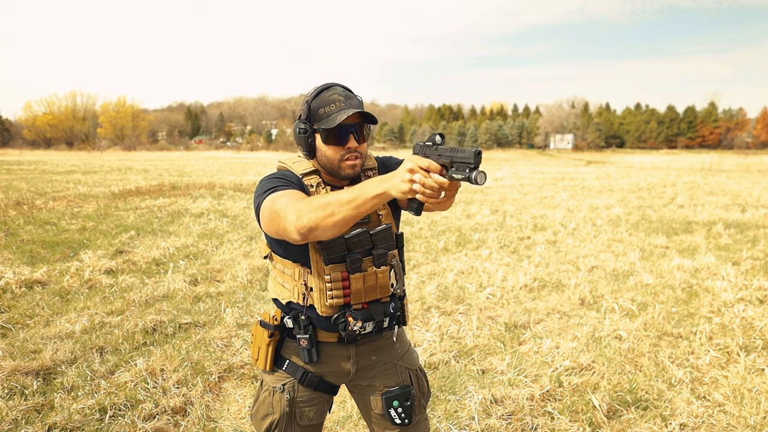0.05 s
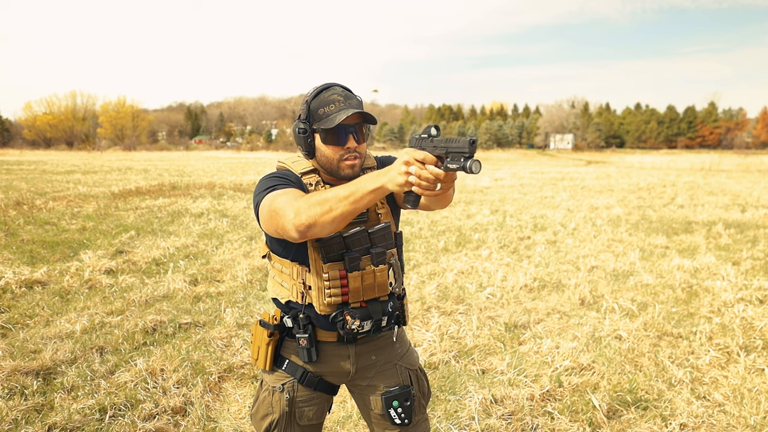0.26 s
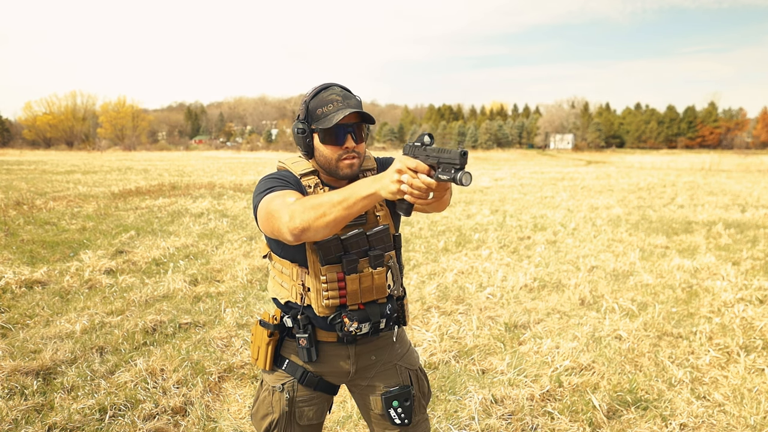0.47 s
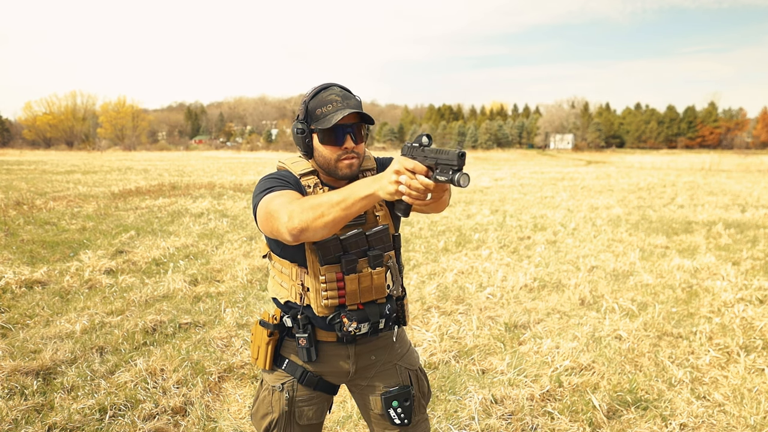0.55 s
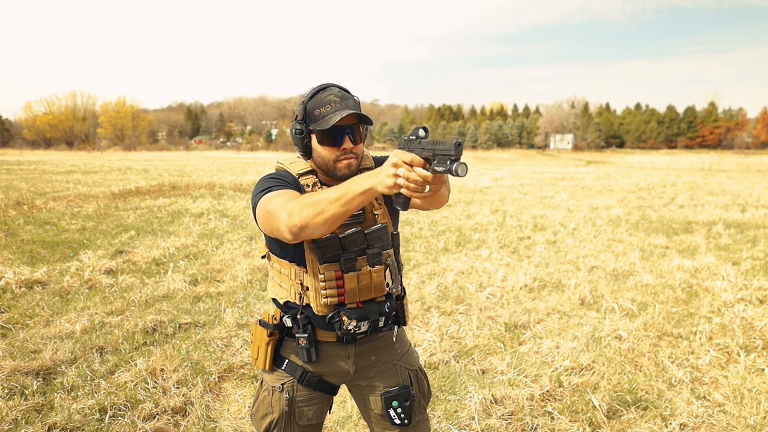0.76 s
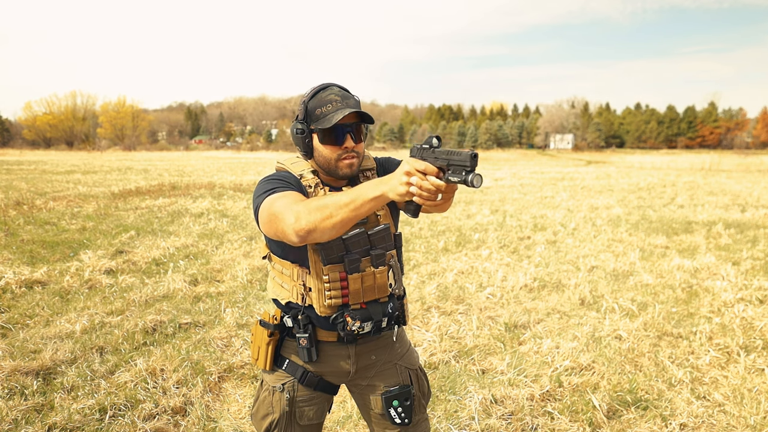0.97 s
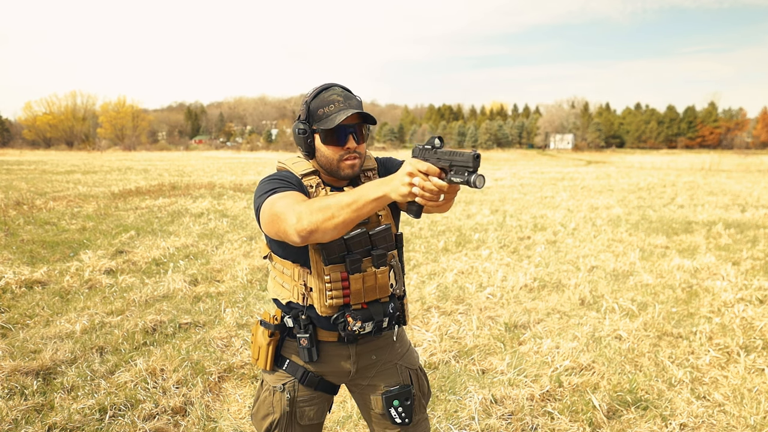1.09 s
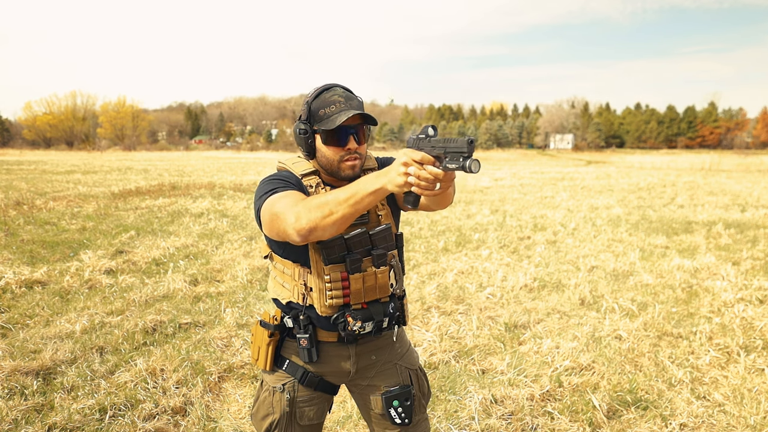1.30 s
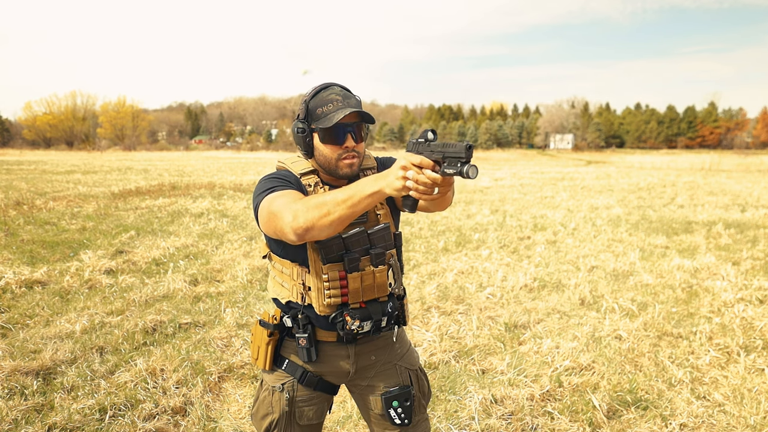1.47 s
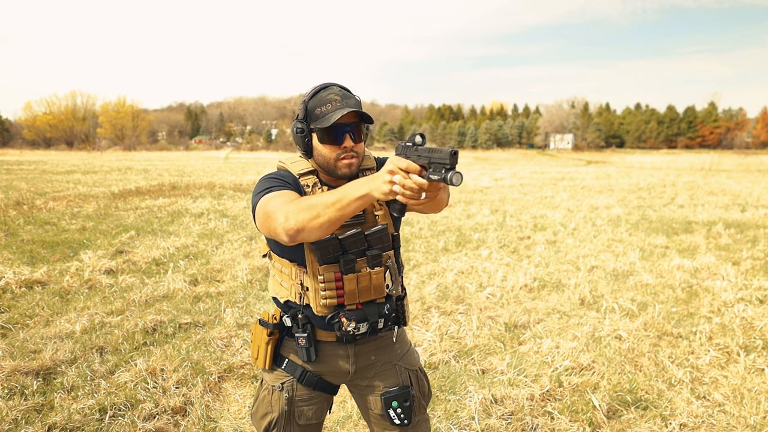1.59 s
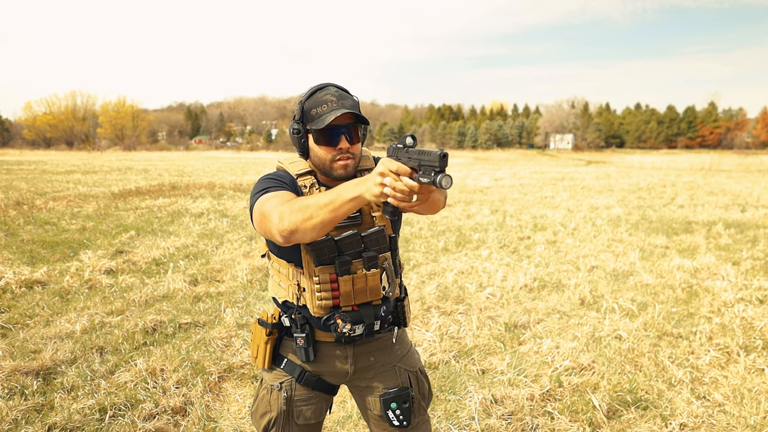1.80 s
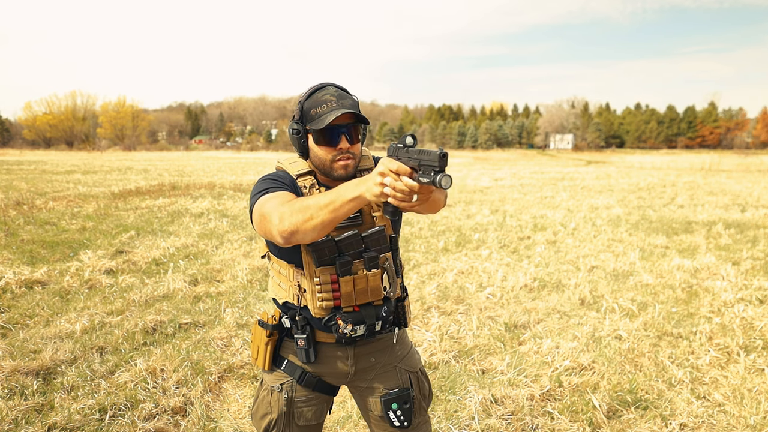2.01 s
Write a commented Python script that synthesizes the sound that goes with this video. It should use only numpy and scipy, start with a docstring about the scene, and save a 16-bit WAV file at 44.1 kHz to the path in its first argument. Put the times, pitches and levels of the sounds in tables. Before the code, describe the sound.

Three sharp pistol shots in an open field, the last two trailed by thin metallic rings

```python
"""Three pistol shots on an open field, close to the microphone, over low wind rumble and distant rustle.
Each shot is a bright crack, the muzzle blast, the slide hitting its stop, a round feeding and the slide
slamming shut: enveloped bursts of coloured noise plus sine swings that sink in pitch.
Thin metal rings, probably the spinning cases, follow the last two shots as decaying pairs of beating sines.
Swishes, clicks, knocks and wind buffets are small noise bursts."""
import sys
import numpy as np
from scipy import signal
from scipy.fft import rfft, irfft
from scipy.io import wavfile

SR = 44100
rng = np.random.default_rng(int(sys.argv[2]) if len(sys.argv) > 2 else 0)


def to_wav(s):
    """Save 16-bit WAV."""
    ch = np.atleast_2d(s).T  # columns
    pcm = np.round(np.clip(ch, -1, 1) * 32767)  # PCM
    wavfile.write(sys.argv[1], SR, pcm.astype(np.int16))


N = 90404
t = np.arange(N) / SR  # s


def undb(db):
    """Decibels to amplitude gain."""
    return 10 ** (np.asarray(db) / 20)


def noise(colour, peaks=(), skirt_db_per_octave=24):
    """Noise of rms 1 shaped by a spectrum and resonances, with skirts falling off outside the spectrum."""
    hz, db = np.array(colour, float).T
    freqs_hz = np.maximum(np.fft.rfftfreq(N, 1 / SR), 1)
    octave, points = np.log2(freqs_hz), np.log2(hz)
    curve_db = np.interp(octave, points, db)
    octaves_outside = abs(octave - np.clip(octave, points[0], points[-1]))
    curve_db -= skirt_db_per_octave * octaves_outside
    for centre_hz, width_hz, gain_db in peaks:
        curve_db += gain_db / (1 + (2 * (freqs_hz - centre_hz) / width_hz) ** 2)
    shaped = irfft(rfft(rng.standard_normal(N)) * undb(curve_db), N)
    return shaped / shaped.std()


def envelope(start_s, attack_s, hold_s, t60_s):
    """Straight rise, hold, exponential fall of 60 dB per t60."""
    age_s = t - start_s
    rise = np.clip(age_s / attack_s, 0, 1)
    fall_s = np.maximum(age_s - attack_s - hold_s, 0)
    return rise * np.exp(-np.log(1000) * fall_s / t60_s)


def burst(sound, start_s, attack_s, hold_s, t60_s, db):
    """A stretch of sound under one envelope."""
    return sound * envelope(start_s, attack_s, hold_s, t60_s) * undb(db)


def field():
    """Wind rumbles and buffets the microphone; far-off rustle and a faint low hum waver a little."""
    # rustle spectrum before tilt: (frequency [Hz], level [dB])
    rustle_spectrum = [(250, -58), (420, -28), (615, -8), (1060, -1), (1990, -9), (2240, -17), (2650, -11),
                       (3710, -22), (9250, -17), (16000, -19)]
    # rumble spectrum: (frequency [Hz], level [dB])
    rumble_spectrum = [(30, -40), (52, -34), (72, -1), (105, 0), (135, -2), (158, 0), (185, -11),
                       (260, -16), (380, -29)]
    # wind buffets: (time [s], attack [s], hold [s], t60 [s], level [dB])
    buffets = [(.96, .015, .02, .12, -48), (1.012, .006, .008, .06, -41), (1.212, .015, .008, .1, -41),
               (1.26, .01, .02, .12, -48), (1.885, .015, .02, .25, -50)]
    # buffet spectrum: (frequency [Hz], level [dB])
    buffet_spectrum = [(50, -30), (80, -6), (150, 0), (210, -12), (350, -36)]
    rustle_db, rustle_wander_rms_db = -60, 1
    tilt_db_per_octave, pivot_hz = -.8, 2000
    rumble_start_db, rumble_rise_db_per_s = -57, 1.5
    hum_hz, hum_db, hum_waver_rms_db = 157, -62, 3
    wander_spectrum = [(2, 0), (8, -4), (25, -14)]  # (frequency [Hz], level [dB])

    tilted = [(hz, db + tilt_db_per_octave * np.log2(hz / pivot_hz)) for hz, db in rustle_spectrum]
    rustle = noise(tilted) * undb(rustle_db + rustle_wander_rms_db * noise(wander_spectrum))
    rumble = noise(rumble_spectrum) * undb(rumble_start_db + rumble_rise_db_per_s * t)
    hum_level_db = hum_db + hum_waver_rms_db * noise(wander_spectrum)
    hum = np.sin(2 * np.pi * hum_hz * t) * undb(hum_level_db)
    buffet = noise(buffet_spectrum)
    return rustle + rumble + hum + sum(burst(buffet, *row) for row in buffets)


def small_sounds():
    """Noise bursts: grassy swishes, trigger and gear clicks, the click of a case being stopped, faint knocks, a
    soft hiss after the first shot."""
    # hisses like brass skimming dry grass: (time [s], attack [s], hold [s], t60 [s], level [dB])
    swishes = [(.30, .01, .06, .13, -52), (.378, .008, .006, .04, -48), (.842, .012, .01, .2, -42),
               (.915, .015, .01, .14, -50), (1.42, .01, .01, .3, -57)]
    # clicks of trigger and gear, and the touch that stops the second case: (time [s], level [dB])
    clicks = [(.4158, -43), (.419, -46), (1.5712, -39)]
    # faint knocks: (time [s], level [dB])
    knocks = [(.468, -49), (.872, -44), (1.063, -51), (1.599, -53), (2.024, -53)]
    # spectra of the four sounds: (frequency [Hz], level [dB])
    swish_spectrum = [(880, -34), (1500, -4), (1920, 0), (2410, -10), (3090, -2), (4460, -14), (5220, -7),
                      (6000, -10), (10500, -4), (14100, -18), (16000, -29)]
    click_spectrum = [(600, -16), (2000, -10), (3500, -3), (6000, -3), (9000, 2), (13000, -4), (16000, -14)]
    knock_spectrum = [(300, -30), (600, -14), (1100, 0), (1600, -6), (2500, -17), (5000, -30), (12000, -42)]
    hiss_spectrum = [(4000, -14), (7000, -2), (9000, 0), (12000, -10)]
    # (attack [s], hold [s], t60 [s])
    click_shape, knock_shape = (.0005, .001, .012), (.001, .003, .04)

    swish, click, knock = noise(swish_spectrum), noise(click_spectrum), noise(knock_spectrum)
    out = burst(noise(hiss_spectrum), start_s=.435, attack_s=.03, hold_s=.04, t60_s=.4, db=-68)
    out += sum(burst(swish, *row) for row in swishes)
    out += sum(burst(click, time_s, *click_shape, db) for time_s, db in clicks)
    out += sum(burst(knock, time_s, *knock_shape, db) for time_s, db in knocks)
    return out


def case_ring(modes, start_s, attack_s, touch_s):
    """Thin brass rings in close pairs of modes that beat as it spins, until a touch damps the lower ones."""
    damped_below_hz, damped_t60_s = 8700, .07
    out = np.zeros(N)
    age_s = t - start_s
    damping = np.exp(-np.log(1000) * np.maximum(t - touch_s, 0) / damped_t60_s)
    for hz, db, hold_s, t60_s, beat_hz, depth in modes:
        pair = np.sin(2 * np.pi * hz * age_s) + depth * np.sin(2 * np.pi * (hz + beat_hz) * age_s)
        pair /= np.hypot(1, depth)  # same power at any beat depth
        ring = burst(pair, start_s, attack_s, hold_s, t60_s, db)
        out += ring * damping if hz < damped_below_hz else ring
    return out


def ringing_cases():
    """Two cases ring, one after the second shot and one after the third."""
    # modes of each case: (frequency [Hz], level [dB], hold [s], t60 [s], beat [Hz], beat depth [0-1])
    modes_a = [(1240, -56, .05, .7, 3, .1), (2051, -41, .06, .17, 38, .6), (3391, -41, .02, .4, 8, .2),
               (3700, -52, .05, .35, 11, .3), (5055, -35, .085, .46, 3.03, .8),
               (5650, -50, .03, .25, 55, .7), (6320, -56, .09, .3, 17, .5), (6600, -48, .05, .2, 45, .6),
               (6804, -36, .02, .18, 60, .4), (7550, -46, .08, .27, 14, .6), (7830, -45, .02, .18, 65, .7),
               (8629, -38, .015, .18, 40, .5), (9292, -38, .02, .2, 30, .5), (10300, -41, .04, .28, 20, .4),
               (11010, -21, .013, .03, 105, .5), (11130, -33, .03, .17, 70, .6),
               (12990, -46, .02, .2, 190, .8), (13640, -35, .01, .12, 70, .5),
               (15750, -57, .02, .35, 20, .3)]
    modes_b = [(1620, -41, .005, .16, 20, .2), (2342, -35.5, .088, .22, 2.7, .45),
               (3450, -56, .02, .5, 25, .5), (4910, -30.5, .02, .24, 3, .15), (6164, -34, .005, .11, 9, .2),
               (8290, -34, .012, .25, 9, .3), (9152, -57, .2, .45, 8.1, .7), (9437, -41, 0, .18, 8, .3),
               (9927, -24, .005, .06, 12, .2), (11260, -35, 0, .11, 15, .3), (13090, -62, .02, .6, 6, .3),
               (14470, -35, 0, .09, 12, .3), (15560, -62, .1, .6, 8, .4)]
    return (case_ring(modes_a, start_s=.841, attack_s=.014, touch_s=1.28)
            + case_ring(modes_b, start_s=1.4155, attack_s=.003, touch_s=1.571))


def stage(shape, colour, peaks, times_s, dbs):
    """One stage of the firing cycle, of set energy and nearly the same in every shot."""
    likeness = .85  # share of the noise power that repeats from shot to shot
    delay_s, attack_s, hold_s, t60_s, stage_db = shape
    common, own = noise(colour, peaks), noise(colour, peaks)
    out = np.zeros(N)
    for start_s, shot_db in zip(times_s, dbs):
        env = envelope(start_s + delay_s, attack_s, hold_s, t60_s)
        aligned = np.roll(common, int(start_s * SR))
        sound = env * (np.sqrt(likeness) * aligned + np.sqrt(1 - likeness) * own)
        to_set_energy = np.sqrt(np.sum(env ** 2) / np.sum(sound ** 2))
        out += sound * undb(stage_db + shot_db) * to_set_energy
    return out


def swing(shot_s, shape, db):
    """A swing of pressure that sinks in pitch as it dies."""
    delay_s, first_hz, last_hz, glide_s, attack_s, hold_s, t60_s = shape
    start_s = shot_s + delay_s
    age_s = np.maximum(t - start_s, 0)
    turns = last_hz * age_s + (first_hz - last_hz) * glide_s * (1 - np.exp(-age_s / glide_s))
    return burst(np.sin(2 * np.pi * turns), start_s, attack_s, hold_s, t60_s, db)


def pistol():
    """Crack and blast, the slide's trip back and forth ending in a clack and thump, and a faint field echo."""
    # shots: (time [s], level [dB], slide-stop level [dB], slam level [dB], thump level [dB])
    shots = [(.2239, 0, .5, -1, -38), (.7587, 0, 0, 1, -26), (1.3428, 0, -1, -1, -22.5)]
    # spectra of the stages: (frequency [Hz], level per Hz [dB])
    crack_spectrum = [(88, -47), (150, -17), (905, -16), (1940, -4), (3290, -1), (4320, -5), (6260, -2),
                      (7040, -11), (9080, 0), (9820, -7), (11300, -4), (14200, -10), (16000, -22)]
    blast_spectrum = [(47, -40), (80, -10), (227, -7), (527, -8), (980, 0), (1860, -2), (2490, -12),
                      (2660, -5), (3320, -2), (4230, -6), (4520, -10), (5770, -9), (6450, -15), (6890, -11),
                      (7700, -16), (8600, -12), (10700, -12), (13700, -17), (16000, -29)]
    tail_spectrum = [(41, -35), (70, -5), (138, -4), (314, -8), (403, -14), (566, -4), (695, -6),
                     (1020, -1), (1170, -5), (1760, -3), (2170, -11), (2480, -7), (3490, -4), (4690, -13),
                     (11400, -10), (13300, -14), (16000, -29)]
    stop_spectrum = [(120, -56), (200, -26), (933, -17), (1810, -4), (2610, -12), (3310, -2), (5040, -5),
                     (7410, -20), (9750, -2), (10900, -5), (11700, 1), (13800, -9), (16000, -28)]
    feed_spectrum = [(120, -51), (200, -21), (1650, -1), (3070, -13), (3830, -12), (4600, -23), (5330, -20),
                     (7680, -32), (9750, -17), (16000, -34)]
    tick_spectrum = [(500, -12), (1200, -1), (3200, 1), (5000, -6), (7700, -10), (10500, -1), (14000, -5),
                     (16000, -8)]
    slam_spectrum = [(120, -55), (200, -25), (659, -15), (1910, 0), (2510, -7), (3130, -2), (3690, -11),
                     (4040, -11), (5130, -20), (6520, -15), (7680, -23), (11100, -12), (12600, -19),
                     (14600, -20), (16000, -26)]
    echo_spectrum = [(100, -4), (250, 1), (450, -9), (700, -1), (1200, 0), (3000, -10), (5000, -18),
                     (9000, -15), (16000, -31)]
    # resonances of the blast: (frequency [Hz], width [Hz], gain [dB])
    blast_peaks = [(250, 70, 4), (430, 110, -9), (580, 80, 8), (660, 40, -3), (735, 40, 4), (900, 90, 5),
                   (1110, 70, 2), (1350, 70, 2), (1650, 300, -3), (3200, 900, 2)]
    # stages: (delay [s], attack [s], hold [s], t60 [s], level before the shot's own [dB])
    crack = (.0001, .0009, .0032, .005, -6)
    blast = (.0057, .0005, .0048, .062, -8.7)
    blast_tail = (.016, .004, .002, .2, -22.5)
    slide_stop = (.0474, .0014, .001, .007, -11.5)
    slide_rattle = (.050, .003, .003, .026, -21.5)
    feed = (.0585, .001, .004, .036, -26)
    slam_tick = (.0713, .0002, .0005, .005, -15)
    slam = (.0713, .0003, .0022, .012, -11)
    slam_tail = (.075, .001, .001, .09, -32)
    field_echo = (.06, .03, .01, .65, -53)
    # swings: (delay [s], start [Hz], end [Hz], glide [s], attack [s], hold [s], t60 [s])
    push = (.001, 320, 110, .018, .005, .003, .07)
    clack = (.0714, 3000, 900, .0021, .0003, .0038, .003)
    thump = (.072, 210, 70, .015, .004, .004, .065)
    push_db, clack_db = -22, -8  # before the shot's own level

    times_s, dbs, stop_dbs, slam_dbs, _ = np.array(shots).T
    stages = [
        (crack, crack_spectrum, (), dbs),
        (blast, blast_spectrum, blast_peaks, dbs),
        (blast_tail, tail_spectrum, (), dbs),
        (slide_stop, stop_spectrum, (), stop_dbs),
        (slide_rattle, stop_spectrum, (), stop_dbs),
        (feed, feed_spectrum, (), dbs),
        (slam_tick, tick_spectrum, (), slam_dbs),
        (slam, slam_spectrum, (), slam_dbs),
        (slam_tail, slam_spectrum, (), slam_dbs),
        (field_echo, echo_spectrum, (), dbs),
    ]
    out = sum(stage(shape, colour, peaks, times_s, levels) for shape, colour, peaks, levels in stages)
    for shot_s, db, _, slam_db, thump_db in shots:
        out += swing(shot_s, push, push_db + db)
        out += swing(shot_s, clack, clack_db + slam_db)
        out += swing(shot_s, thump, thump_db)
    return out


def scene():
    """Everything at one microphone."""
    return (field() + small_sounds() + ringing_cases() + pistol())[None]


def record(dry):
    """The recorder rounds the loudest peaks and cuts the deep bass and the top."""
    ceiling, low_cut_hz, top_hz = 1.15, 66, 16200
    low_cut = signal.butter(4, low_cut_hz, "high", fs=SR, output="sos")
    low_pass = signal.ellip(8, .2, 75, top_hz, fs=SR, output="sos")  # .2 dB ripple, 75 dB stopband
    rounded = ceiling * np.tanh(dry / ceiling)
    return signal.sosfilt(low_pass, signal.sosfilt(low_cut, rounded))


dry = scene()
out = record(dry)
to_wav(out)
```